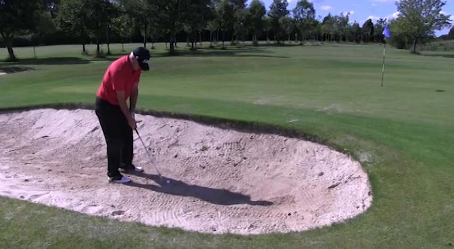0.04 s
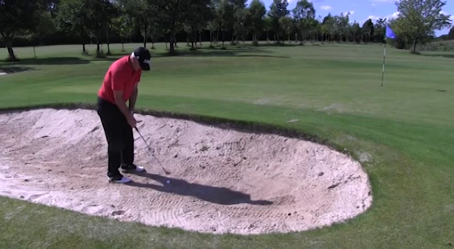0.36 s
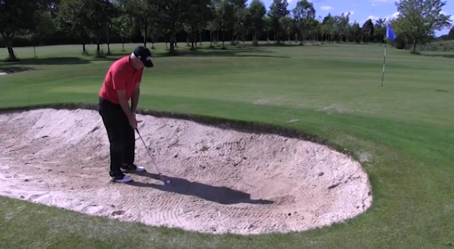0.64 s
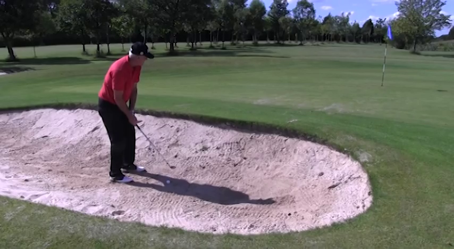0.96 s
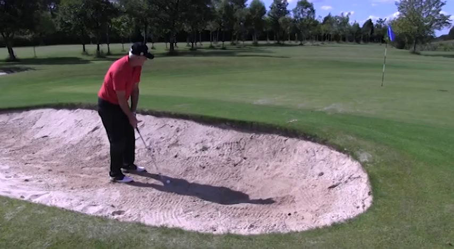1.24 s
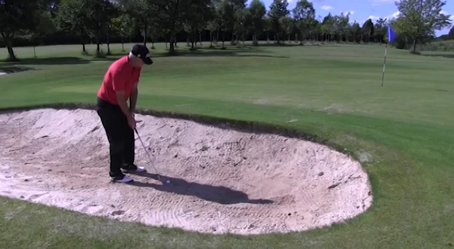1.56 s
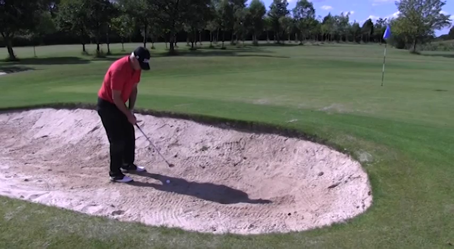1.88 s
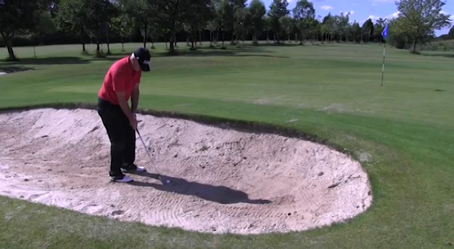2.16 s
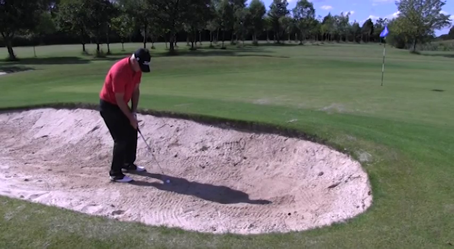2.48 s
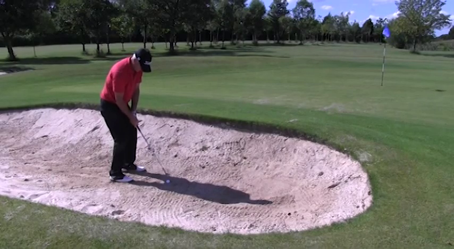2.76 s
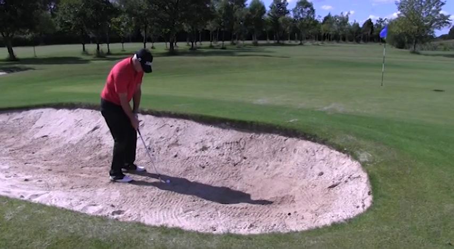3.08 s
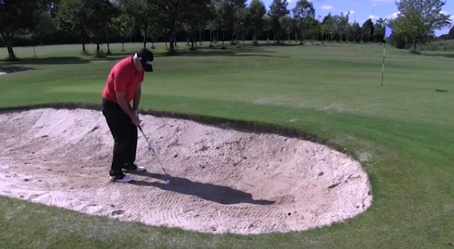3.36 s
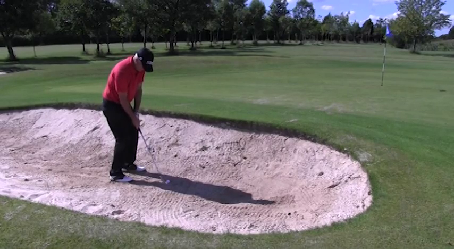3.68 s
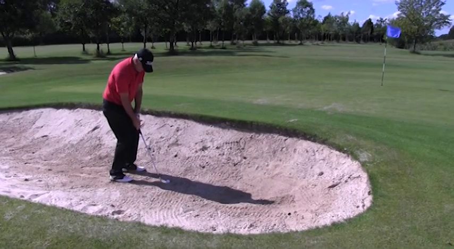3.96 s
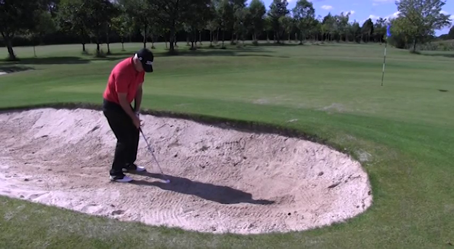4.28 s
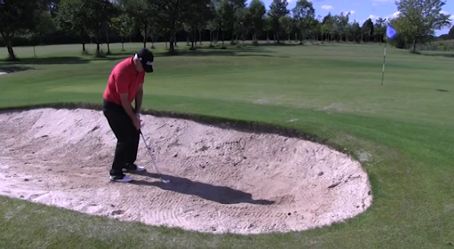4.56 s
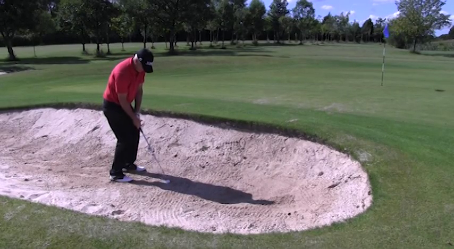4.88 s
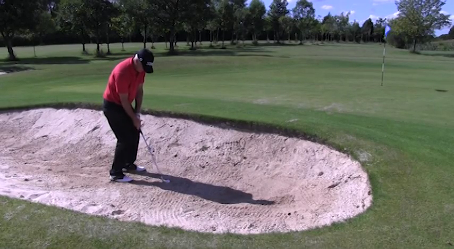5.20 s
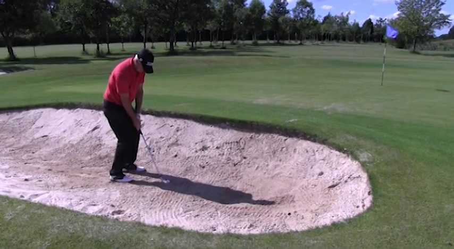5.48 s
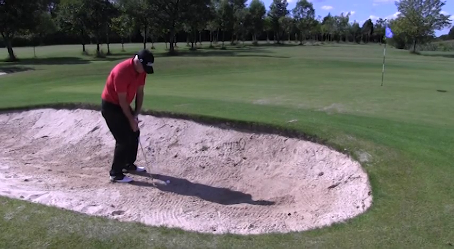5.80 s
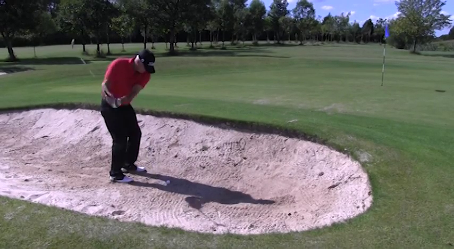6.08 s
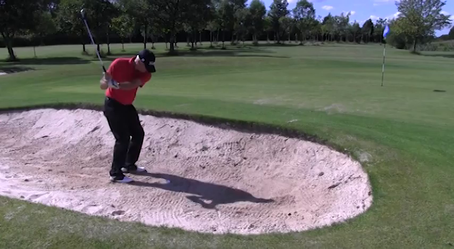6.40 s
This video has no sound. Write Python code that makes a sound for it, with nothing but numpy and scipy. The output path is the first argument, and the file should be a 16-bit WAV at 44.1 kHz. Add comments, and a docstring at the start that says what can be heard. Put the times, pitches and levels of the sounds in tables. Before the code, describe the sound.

Outdoors on a breezy day, deep gusts buffet the microphone over a quiet, steady hiss of distant traffic and leaves. Shoes scuff and crunch faintly in a sand bunker at first, with a tiny far chirp or two. Midway, the low hum of a far-off mower rises and sinks away. Near the end comes the strongest wind thump, more rumbling and one last faint slide of sand.

```python
"""A golfer shuffles his shoes into the sand of a bunker, then stands still, on a breezy day.
The sliding grains hiss, crunch under his weight and rasp as a sole twists.
Swirls of air (eddies) rumble and thump on the microphone. A far engine, likely a mower, hums
under the wash of distant traffic and trees, with a few faint chirps. The camera adds a thin whine."""
import sys
import numpy as np
from scipy import signal
from scipy.fft import rfft, irfft, next_fast_len
from scipy.io import wavfile
from scipy.ndimage import uniform_filter1d

SR = 44100
rng = np.random.default_rng(int(sys.argv[2]) if len(sys.argv) > 2 else 0)


def persist_wave(psi):
    """Save psi, clipped to +-1, as 16-bit WAV."""
    counts = np.round(np.clip(psi, -1, 1) * 32767).astype(np.int16)
    wavfile.write(sys.argv[1], SR, np.atleast_2d(counts).T)


N = 288414
TIME = np.arange(N) / SR

# Tone of distant traffic and trees: frequency_hz, level_db
WASH_SPECTRUM = [(20, -6), (90, 4), (200, -1), (350, -3.5), (440, -2.5), (640, -4), (840, .5), (1300, -5),
                 (1650, -11.5), (2050, -13.5), (2900, -20), (4100, -20.5), (5200, -24), (7000, -31),
                 (15500, -41)]
# Far-off chirps, likely birds: middle_s, pitch_hz, level_db, half_length_s, glide_octaves_per_s
CHIRPS = [(1.243, 1360, -59.5, .025, 0), (1.621, 800, -56.5, 0.026, 1.6), (1.675, 1950, -66, .018, 0),
          (3.959, 2270, -68, .02, -.5), (3.88, 8330, -84, 0.023, -.9), (4.025, 8020, -85, .013, -.5),
          (4.11, 7830, -83.5, .022, -.6)]
# Engine tones at 1, 2 and 3 times its firing rate: resting_db, swell_peak_db, swell_peak_s
ENGINE_TONES = [(-60, -42, 2.48), (-69, -58, 3.48), (-72, -73, 3.35)]
# Gusts of wind: start_s, length_s, level_db
WIND_GUSTS = [(0.474, 0.6, -43.2), (2.0, 0.88, -45.5), (5.016, 0.63, -43), (6.0, 0.1, -42.8)]
# Tone of the wind's deep rumble and of its higher flutter: frequency_hz, level_db
RUMBLE_SPECTRUM = [(10, -24), (22, -2), (40, 1.5), (80, 0), (120, -6), (170, -14.5), (250, -32.5),
                   (400, -40.5), (900, -73)]
FLUTTER_SPECTRUM = [(50, -13.5), (150, 0.0), (260, -11.0), (500, -29.0), (1500, -66)]
# Single large eddies hitting the microphone: middle_s, peak_db, pitch_hz
EDDIES = [(0.471, -27.5, 61.8), (0.616, -37, 55.85), (0.684, -30.5, 88), (0.773, -30.5, 118),
          (0.878, -33, 62), (1.035, -34.5, 98.3), (1.105, -34.5, 38), (1.154, -32.5, 50),
          (1.244, -30.5, 70.8), (1.54, -34.5, 38), (2.0, -36, 54), (2.28, -37, 44), (2.515, -34.5, 40),
          (2.92, -36, 72), (4.967, -20, 44), (5.002, -31, 88), (5.057, -32.5, 130), (5.074, -34, 48),
          (5.15, -36.5, 64), (5.38, -33, 46), (5.44, -34.5, 44), (5.612, -31.5, 49.8), (5.682, -32, 71),
          (5.765, -35.5, 48), (6.028, -33, 66), (6.085, -32, 84), (6.24, -38, 48)]
# Tone of loose grains sliding on top of the sand: frequency_hz, level_db
SLIDE_SPECTRUM = [(500, -11), (1800, -1.5), (3700, 2), (5500, -4), (8000, -7), (12000, -15.5), (16000, -15)]
# Tone of packed sand under the sole: frequency_hz, level_db
CRUNCH_SPECTRUM = [(300, -26), (900, 7.5), (1400, 5.5), (2500, -13), (4000, -4.5), (7000, -28),
                   (16000, -42)]
# Tone of sand scraping the edge of the sole: frequency_hz, level_db
RASP_SPECTRUM = [(600, -24), (1400, 0), (2100, 0), (3000, -2), (4500, -10.5), (7000, -24), (16000, -44)]
# Scuffs on the sand: start_s, length_s, level_db, crunch_offset_db, rasp_offset_db
SHOE_SCUFFS = [(-.02, 0.085, -66.5, 6.5, -1), (0.157, .125, -71.5, -8, -12), (.405, .03, -72, -6, 0),
               (.5, 0.11, -76, -5, -5), (0.801, 0.05, -63, 6, -5), (0.862, 0.14, -69, 4, 1),
               (1.02, .045, -75, -2, -4), (1.113, 0.042, -70, 4, 4.5), (1.22, 0.082, -76.5, 11, -1),
               (1.394, 0.091, -71.5, -11, -12), (1.485, 0.068, -67, -18, -14), (1.713, 0.1, -73, 6, -6),
               (5.76, .012, -73, 6, 4), (6.24, .014, -72, 4, 6), (6.284, 0.26, -75.5, 1, -8)]


def gain(db):
    """Turn decibels into a number to multiply a sound by."""
    return 10 ** (np.asarray(db) / 20)


def normalize(sound):
    """Scale a sound so that its average strength (rms) is 1."""
    return sound / np.sqrt(np.mean(sound ** 2))


def shape_tone(sound, spectrum):
    """Filter a sound along a curve of (frequency_hz, level_db) points, then set its strength to 1."""
    hz, db = np.transpose(spectrum)
    size = next_fast_len(N)
    bins_hz = np.arange(size // 2 + 1) * SR / size
    curve_db = np.interp(np.log(bins_hz + 1), np.log(hz), db)
    return normalize(irfft(rfft(sound, size) * gain(curve_db), size)[:N])


def wobble(rate_hz):
    """A smooth random curve of strength 1 that heads for a new value rate_hz times a second."""
    hold = max(int(SR / rate_hz), 1)
    steps = np.repeat(rng.standard_normal(N // hold + 1), hold)
    ramps = uniform_filter1d(steps, hold)
    return normalize(uniform_filter1d(ramps, hold)[:N])


def camera_whine(pitch_hz=13175, picture_rate_hz=50, level_db=-100, fizz_db=-99):
    """The camera's thin whine beats against a tone one picture rate higher, inside a narrow fizz."""
    tone = np.sin(2 * np.pi * pitch_hz * TIME)
    partner = np.sin(2 * np.pi * (pitch_hz + picture_rate_hz) * TIME)
    fizz = wobble(500) * tone
    return gain(level_db) * (tone + partner) + gain(fizz_db) * fizz


def distant_wash(settled_db=-56, start_extra_db=1.64, settle_s=3.1, flicker_db=0.3):
    """Far tyres and leaves blur into a hiss; the air makes its middle pitches flicker."""
    wash = shape_tone(rng.standard_normal(N), WASH_SPECTRUM)
    flicker = np.zeros(N)
    for hz in np.geomspace(500, 2000, 5):
        band = signal.butter(2, [hz / 2 ** 0.25, hz * 2 ** 0.25], "band", fs=SR, output="sos")
        flicker += signal.sosfilt(band, wash) * (gain(flicker_db * wobble(12)) - 1)
    return (wash + flicker) * gain(settled_db + start_extra_db * np.exp(-TIME / settle_s))


def far_chirps(blur=0.014):
    """Brief chirps, blurred by the distance, rise just above the wash."""
    out = np.zeros(N)
    for middle_s, hz, db, half_length_s, glide in CHIRPS:
        pitch_hz = hz * 2 ** (glide * (TIME - middle_s)) * (1 + blur * wobble(400))
        fade = np.exp(-((TIME - middle_s) / half_length_s) ** 2)
        out += gain(db) * fade * np.sin(2 * np.pi * np.cumsum(pitch_hz) / SR)
    return out


def far_engine(firing_hz=101.56, waver=0.0035, flicker_db=1.0, rise_db_per_s=9.5, fall_db_per_s=5.5):
    """Only an engine's lowest tones carry this far; each swells once and fades as the air shifts."""
    phase = 2 * np.pi * np.cumsum(firing_hz * (1 + waver * wobble(4))) / SR
    out = np.zeros(N)
    for multiple, (resting_db, peak_db, peak_s) in enumerate(ENGINE_TONES, 1):
        drop_db = np.maximum(rise_db_per_s * (peak_s - TIME), fall_db_per_s * (TIME - peak_s))
        loudness = np.hypot(gain(resting_db), gain(peak_db - drop_db))
        flicker = gain(flicker_db * wobble(7))
        out += loudness * flicker * np.sin(multiple * phase + 2 * np.pi * rng.random())
    return out


def breeze_level_db(lull_db=-48.5, rise_s=0.17, sag_db_per_s=2, fall_s=0.3):
    """Each gust arrives quickly, weakens a little as it blows and dies back into the lull."""
    power = gain(lull_db) ** 2
    for start_s, length_s, db in WIND_GUSTS:
        age_s = TIME - start_s
        rise = np.exp(np.minimum(age_s, 0) / rise_s)
        fall = np.exp(-np.maximum(age_s - length_s, 0) / fall_s)
        sag_db = sag_db_per_s * np.clip(age_s, 0, length_s)
        power = power + (rise * fall * gain(db - sag_db)) ** 2
    return 10 * np.log10(power)


def wind(rumble_wobble_db=1.0, flutter_top_db=-53.5, flutter_wobble_db=2.5):
    """Swirling air rumbles on the microphone; faster air makes smaller eddies, which flutter higher."""
    breeze_db = breeze_level_db()
    rumble = shape_tone(rng.standard_normal(N), RUMBLE_SPECTRUM)
    rumble *= gain(breeze_db + rumble_wobble_db * wobble(18))
    flutter_db = flutter_top_db + 1.84 * (breeze_db - breeze_db.max())  # grows faster than the rumble
    flutter = shape_tone(rng.standard_normal(N), FLUTTER_SPECTRUM)
    flutter *= gain(flutter_db + flutter_wobble_db * wobble(25))
    return rumble + flutter


def eddy_thumps(longest_half_cycles=1.29, db_per_doubling=19, waver=0.0785):
    """A large eddy rocks the air pressure for a few uneven cycles; stronger ones last more cycles."""
    out = np.zeros(N)
    strongest_db = max(db for _, db, _ in EDDIES)
    for middle_s, db, hz in EDDIES:
        half_length_s = longest_half_cycles * 2 ** ((db - strongest_db) / db_per_doubling) / hz
        cycles = np.cumsum(hz * (1 + waver * wobble(50))) / SR + rng.random()
        fade = np.exp(-((TIME - middle_s) / half_length_s) ** 2)
        out += gain(db) * fade * np.sin(2 * np.pi * cycles)
    return out


def sand_grains(clicks_per_s):
    """Moving grains make a dense shower of tiny clicks of uneven size."""
    return (rng.random(N) < clicks_per_s / SR) * rng.uniform(-0.97, 1, N)


def shoes_in_sand(fade_s=0.015, uneven_db=0.94):
    """Sand slides in fits as a shoe shifts; weight adds a lower crunch, and twisting a coarse rasp."""
    slide, press, twist = np.zeros((3, N))
    for start_s, length_s, db, crunch_offset_db, rasp_offset_db in SHOE_SCUFFS:
        fade_in = np.clip((TIME - start_s) / fade_s + 0.5, 0, 1)
        fade_out = np.clip((start_s + length_s - TIME) / fade_s + 0.5, 0, 1)
        scuff = fade_in * fade_out * gain(db)
        slide += scuff
        press += scuff * gain(crunch_offset_db)
        twist += scuff * gain(rasp_offset_db)
    hiss = shape_tone(sand_grains(clicks_per_s=6000), SLIDE_SPECTRUM)
    crunch = shape_tone(sand_grains(clicks_per_s=2400), CRUNCH_SPECTRUM)
    rasp = shape_tone(sand_grains(clicks_per_s=2600), RASP_SPECTRUM)
    return (slide * hiss + press * crunch + twist * rasp) * gain(uneven_db * wobble(70))


def scene():
    """All the sounds add up at one microphone in the open air."""
    nearby = wind() + eddy_thumps() + shoes_in_sand()
    return (nearby + far_engine() + distant_wash() + far_chirps() + camera_whine())[None]


def record(dry, cutoff_hz=15500):
    """The camera sharply cuts off the highest treble."""
    return signal.sosfilt(signal.ellip(10, 0.1, 80, cutoff_hz, fs=SR, output="sos"), dry)


dry = scene()
out = record(dry)
persist_wave(out)
```